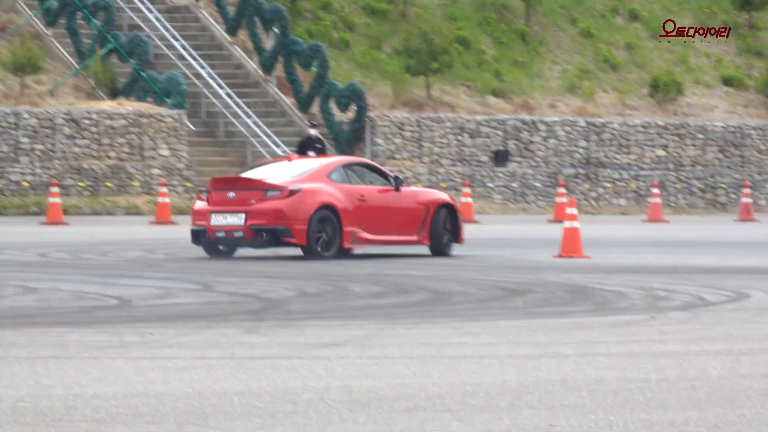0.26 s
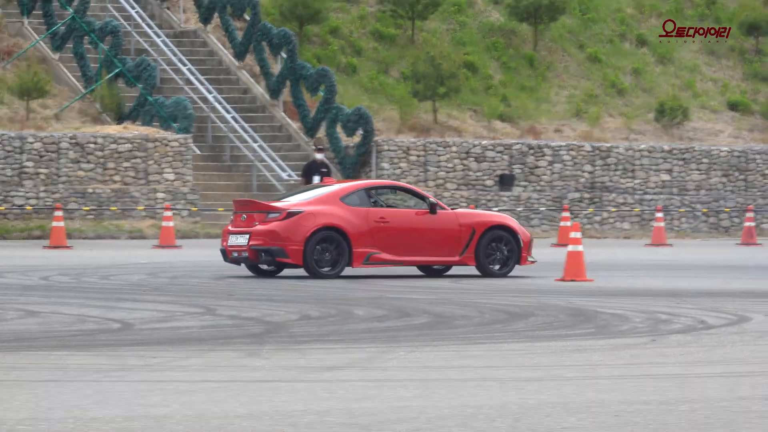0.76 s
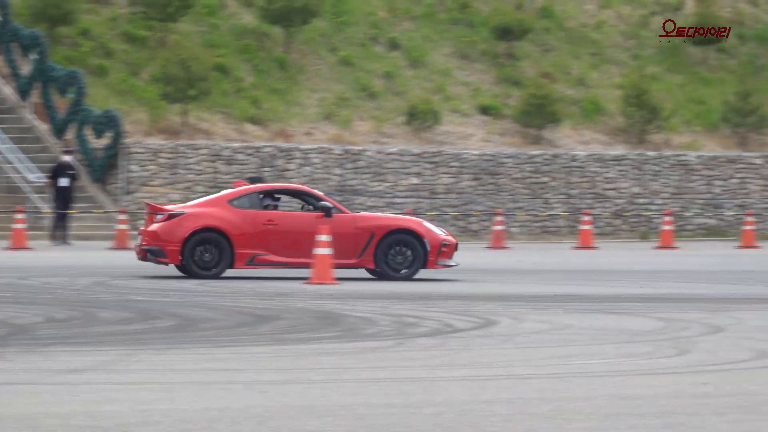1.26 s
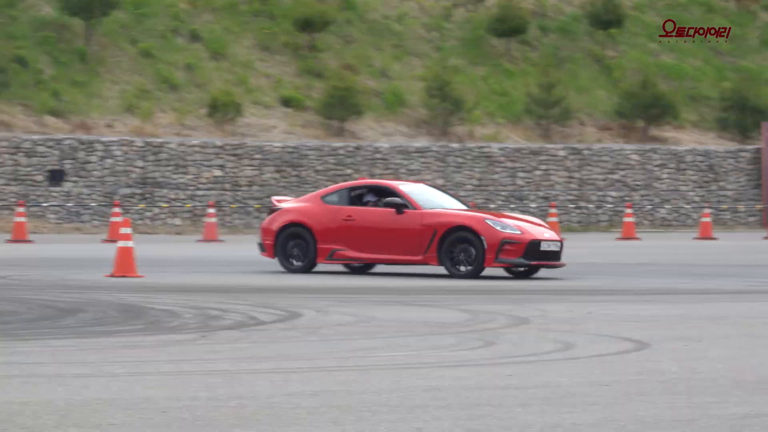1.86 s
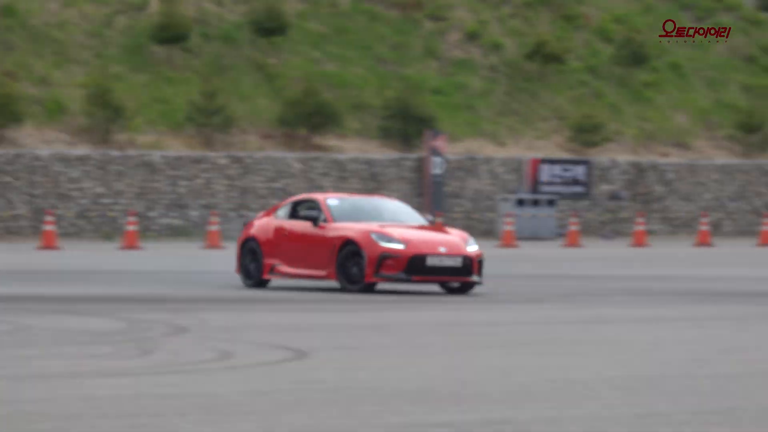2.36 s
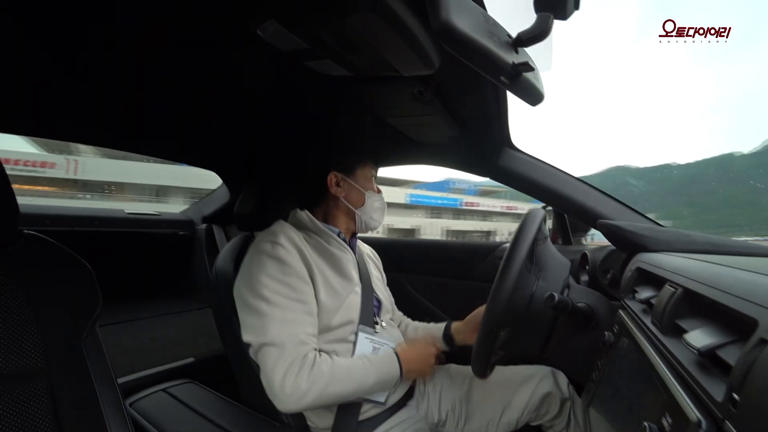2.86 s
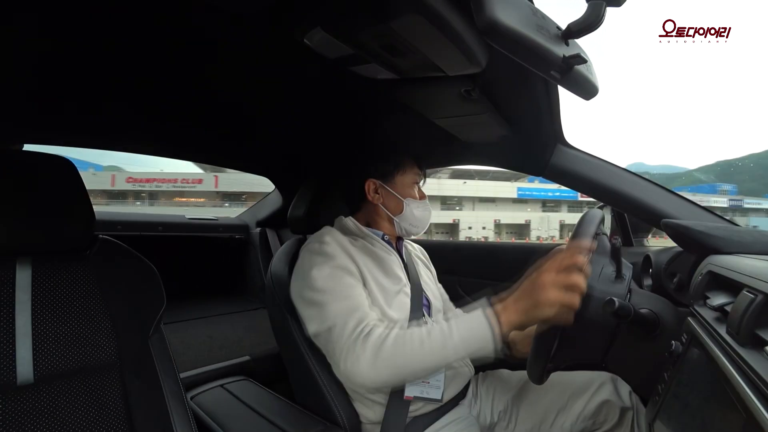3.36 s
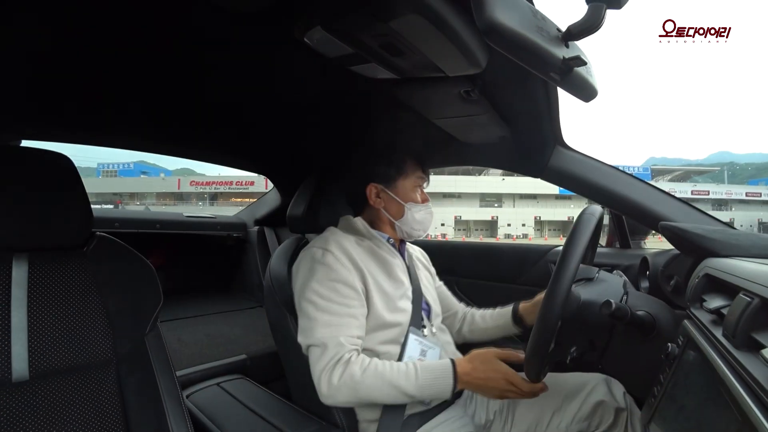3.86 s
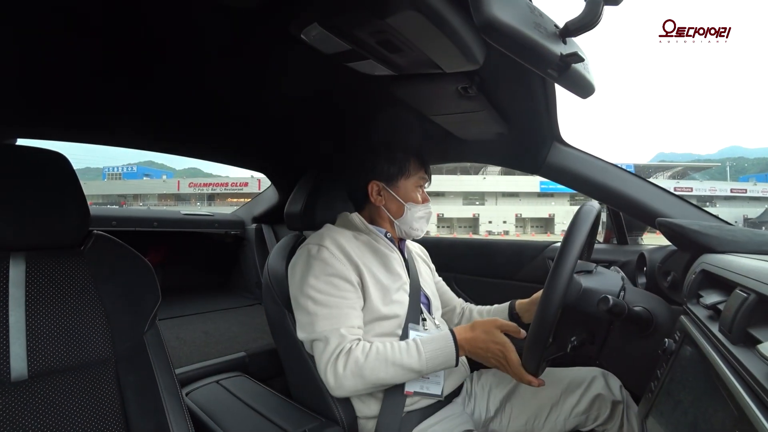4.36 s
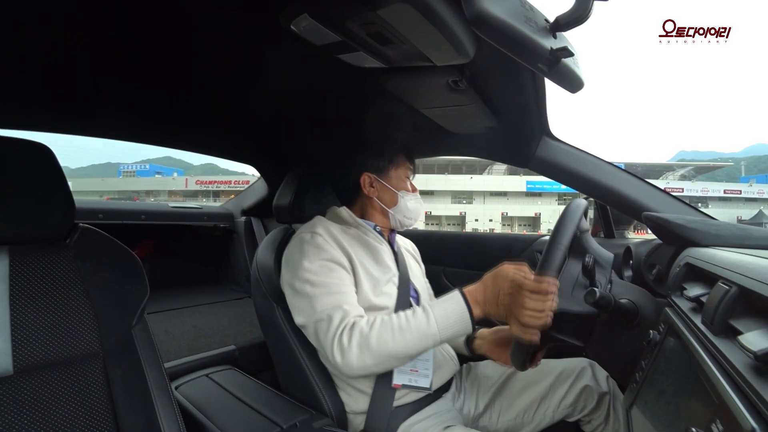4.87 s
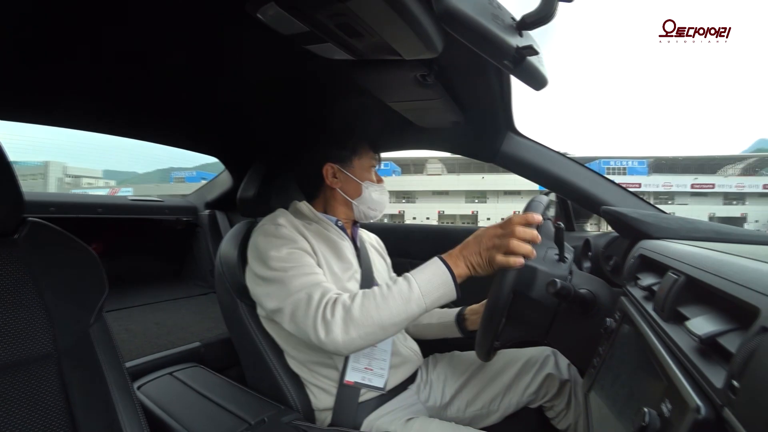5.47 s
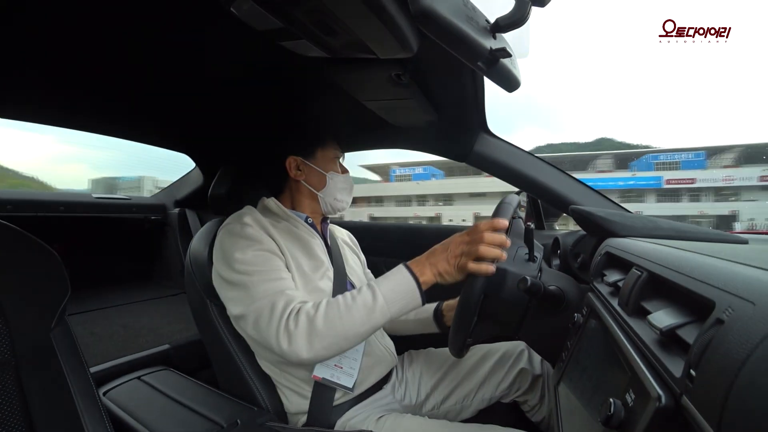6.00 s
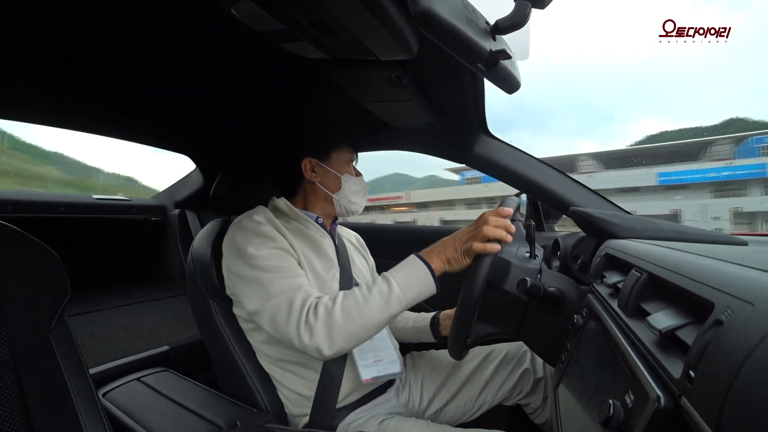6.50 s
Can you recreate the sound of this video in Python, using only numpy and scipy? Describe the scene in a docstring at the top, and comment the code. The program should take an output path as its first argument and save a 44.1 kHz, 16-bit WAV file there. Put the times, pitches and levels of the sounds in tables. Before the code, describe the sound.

Loud wavering tyre screech outdoors over a rising distant engine, then an abrupt jump into a car cabin with low engine growl, road rumble and loose knocks.

```python
"""Tyres of a sports car drifting round cones screech, heard in open air beside a stone wall, over a rising engine.
Each tread is a wavering stick-slip tone with harmonics; torn rubber and grit are coloured noise.
The second place is the cabin: flat-four tones at multiples of the crankshaft speed pull up from low revs.
Filtered noise makes road rumble, squeaks and the driver's sleeves; short decaying rings with clicks make knocks,
the first three soft, like a sleeve brushing, the rest loose trim. A limiter holds the peaks of both ears."""
import sys
import numpy as np
from scipy import signal
from scipy.fft import rfft, irfft, next_fast_len
from scipy.io import wavfile
from scipy.ndimage import uniform_filter1d, minimum_filter1d, map_coordinates

SR = 44100
rng = np.random.default_rng(int(sys.argv[2]) if len(sys.argv) > 2 else 0)


def unload_wav(signal):
    """Save mono or channel-first audio to the path in sys.argv[1] as 16-bit WAV at rate SR, clipped to [-1, 1]."""
    wavfile.write(
        sys.argv[1],
        SR,
        np.round(np.clip(np.atleast_2d(signal).T, -1, 1) * 32767).astype(np.int16),
    )


N = 297230
T = np.arange(N) / SR
CUT_S, CUT_FADE_S = 2.742, .012  # middle and length of the jump from trackside to cabin

# Trackside, tyres. Squeal levels are those before flutter.
# leading tyre: time_s, pitch_hz, level_db, second_harmonic_db (over the fundamental)
LEADING_TYRE = [(0, 694.3, -18, -4), (.13, 697.5, -20, -6), (.22, 695, -20.5, -15), (.31, 700, -17, -12),
                (.38, 706.3, -23.5, -5), (.44, 723, -15.5, -7.5), (.6, 753, -16, -12.5),
                (.75, 768.6, -19, -11), (.85, 814.5, -24, -13.5), (1, 839, -24.5, -20),
                (1.15, 858.3, -25, -17), (1.5, 866.3, -25, -12.5), (1.75, 871.3, -22, -14),
                (1.85, 875, -24, -10), (1.93, 877.2, -17.5, -18), (2.1, 859, -19.5, -20),
                (2.22, 828, -23.5, -16), (2.3, 773, -19, -9.5), (2.44, 763, -21.5, 0.5),
                (2.74, 763, -24, -3)]
# its harmonics 3 to 5 over the fundamental in a full slide: before_spin_db, after_spin_db
LEADING_OVERTONES = [(-19.5, -14), (-15.5, -21.5), (-27.5, -36.5)]
OVERTONES_GROW = 1  # their dB per dB of slide force
# heavily loaded tyre, base level before each harmonic's offset: time_s, pitch_hz, level_db
LOADED_TYRE = [(0, 626, -24), (.17, 628, -21.5), (.23, 650, -28), (.3, 670, -25.5), (.4, 702, -26),
               (.48, 720, -37.5), (.67, 725, -32), (.73, 745, -46), (1.3, 803, -49), (1.8, 807, -42.5),
               (1.95, 801, -35), (2.2, 784, -32.5), (2.4, 764, -32.5)]
# inner rear tyre, spinning a little faster and beating against the leading one: time_s, pitch_hz, level_db
INNER_TYRE = [(.7, 830, -48), (.95, 886.7, -23.5), (1.06, 899.4, -29.5), (1.15, 910, -18.5),
              (1.26, 918.3, -29.5), (1.34, 920, -28.5), (1.7, 925, -26), (2, 939.7, -23.5), (2.2, 943, -20),
              (2.47, 950, -34.5), (2.54, 940, -17.5), (2.74, 947, -18.5)]
# the inner tyre grabs and yelps: peak_s, gain_db (over its squeal)
INNER_GRABS = [(1.134, 5.5), (1.234, 12), (1.398, 11), (1.473, 10), (2.166, 5)]
GRAB_S = .014  # length of a grab
# lightly loaded tyre: time_s, pitch_hz, level_db
LIGHT_TYRE = [(.15, 900, -46.5), (.31, 926, -32), (.5, 942, -29.5), (.62, 958, -38), (.72, 979, -27.5),
              (.8, 1002, -25), (.92, 997, -33.5), (1.27, 1004, -33), (1.75, 1002, -29), (2, 1023, -24.5),
              (2.17, 1042, -22.5), (2.3, 1019, -21), (2.5, 1005, -21.5), (2.74, 1035, -28)]
# tread rib, strongest on harmonics 3 and 4, base level before their offsets: time_s, slip_hz, level_db
TREAD_RIB = [(.17, 667, -54), (.21, 674.3, -26.5), (.3, 692.4, -29.5), (.36, 702.7, -32), (.46, 730, -31.5),
             (.55, 738, -38.5), (.65, 762, -34), (.73, 795, -40), (.82, 832, -43), (.95, 844, -56),
             (1.1, 863, -80)]
# tread blocks locked onto one note: start_s, end_s, pitch_hz, fundamental_db, second_harmonic_db
HELD_NOTES = [(-.05, .28, 597.7, -30, -25.5), (0.032, .28, 648, -39, -25.5), (2.615, 2.708, 657, -31, -45)]
HELD_EDGE_S = .04  # such a note builds and breaks in this time
# raggedness of the squeal: time_s, roughness (0-1)
SQUEAL_RAGGEDNESS = [(.35, .33), (.7, .44), (.95, .8), (2.1, .8), (2.35, .7)]
# force of the slide, read against FULL_SLIDE_DB: time_s, force_db
SLIDE_FORCE = [(0.0, -37.5), (0.63, -41.5), (0.73, -47.5), (0.95, -49.5), (1.07, -55), (1.41, -55),
               (2.29, -37.5), (2.52, -40), (2.7, -41.5)]
FULL_SLIDE_DB = -39
# the wheels spin up: from_s, to_s
SPIN_UP = [0.59, 0.95]

# Trackside, noise and engine. Noise spectra are relative: the noise is then levelled.
# rubber sliding, before the wheels spin: freq_hz, density_db (per Hz)
SLIDING_RUBBER = [(100, -60.5), (300, -33.5), (450, -25), (600, 0), (950, 3.5), (1180, 3), (1450, 5.5),
                  (1750, -3), (2150, 0), (2900, -7), (3400, -14.5), (5000, -20), (8000, -65.5)]
# rubber under spinning wheels: freq_hz, density_db (per Hz)
SPINNING_RUBBER = [(100, -59.5), (450, -20.5), (570, -9), (720, 3), (950, 9), (1120, 2), (1300, 0.5),
                   (1600, 3.5), (1950, -1.5), (2300, -3.5), (2600, -4.5), (2950, -6.5), (3400, -17),
                   (5000, -18), (8000, -63.5)]
# thrown grit: freq_hz, density_db (per Hz)
GRIT_HISS = [(1880, -34), (3200, -3.5), (4140, -6.5), (4900, -17.5), (6730, -21.5), (12800, -52.5),
             (15000, -56.5)]
SCRUB_DB, SCRUB_GROWS = -23.5, 0.51  # tearing rubber in a full slide; dB per dB of force
GRIT_DB, GRIT_GROWS = -35, 1.1  # grit, likewise
# distant engine: time_s, crankshaft_hz, firing_tone_db
FAR_ENGINE = [(.4, 39.96, -80.5), (.8, 61.76, -58.5), (1, 68.25, -50), (1.25, 73.6, -46),
              (1.5, 81.33, -43.5), (1.85, 96.68, -41.5), (2, 103.3, -47.5), (2.17, 107.5, -45),
              (2.4, 106, -76)]
# its crank orders over the firing tone: order (per turn), low_revs_db, high_revs_db
EXHAUST_ORDERS = [(2, 0, -4.5), (3, 1, -1.5), (4, -2, -1), (4.5, -18, -8), (5, -14.5, -3.5), (5.5, -18, -8),
                  (6, -11.5, -3.5), (8, -7, -1)]
# tailpipe resonances: freq_hz, gain_db
TAILPIPE = [(80, 0.5), (150, -3.5), (190, 0), (220, -4), (270, -9), (320, -4), (360, -5.5), (400, 3.5),
            (440, -5), (500, -1.5), (620, 6), (700, 10), (900, 6)]
FAR_FRAY = .21  # unevenness from firing to firing (0-1)
# open air of the place: freq_hz, density_db (per Hz)
OUTDOOR_AIR = [(25, -14.5), (70, -14), (130, -4.5), (220, 2.5), (500, 5), (1500, 5.5), (6000, -31.5),
               (15000, -34.5)]
WALL_DB = -9  # the stone wall's echo before its bass cut, under the direct sound
# noise outdoors: freq_hz, left_right_likeness (0-1)
OUTDOOR_LIKENESS = [(200, 0.89), (700, 0.99), (2000, 0.3), (6000, 0.54), (12000, .3)]
# left ear over right outdoors: freq_hz, level_db
EAR_LEVEL = [(200, 0), (380, -1), (700, -5), (1290, -8.5), (2380, -10.5), (4400, 1.5), (8000, -14),
             (15000, 11)]
# phase by which the left ear leads outdoors: freq_hz, lead_rad
EAR_PHASE = [(100, 1.5), (1400, 0.31), (2400, 1), (4100, -2.07), (4750, -2.5), (6200, -9), (14000, -14.5)]

# Cabin, engine from the seat.
# engine speed: time_s, crankshaft_hz
CABIN_REVS = [(2.76, 30.4), (2.92, 32.03), (3.1, 29.3), (3.3, 33.43), (3.45, 33.58), (3.6, 37.06),
              (4.2, 43.15), (4.4, 46.2), (4.62, 49.41), (5, 55.95), (5.46, 63.28), (5.8, 67.63), (6, 66),
              (6.3, 59.4), (6.74, 57.75)]
# growl, over its common level: order (per turn), low_revs_db, high_revs_db
GROWL_ORDERS = [(1, -13, -4), (2.5, -27, -13.5), (3, -8, -5.5), (3.5, -19, -19.5), (4, 1, -2),
                (4.5, -15, -14), (5, -9, -6.5), (5.5, -11.5, -8.5), (6, -8.5, -4.5), (6.5, -11, -14),
                (7, -10, -12), (7.5, -18, -15.5), (8, -11, -8.5), (9, -11.5, -14), (9.5, -20, -10.5),
                (10, -7, -16), (11, -17.5, -14), (12.1, -6.5, -10.5), (14, -10.5, -18.5), (15.5, -16, -18),
                (17.8, -10, -14), (20, -13, -20)]
# boom of the cabin on the firing tone: freq_hz, gain_db
CABIN_BOOM = [(60, 1), (68, -1.5), (75, -1), (81, -4), (87, 3), (95, -4.5), (100, -3), (106, 2.5),
              (114, -5), (123, 4.5), (129, -3), (134, -4)]
# cabin resonances on the growl: freq_hz, gain_db
CABIN_RESONANCES = [(60, -12.5), (135, -5), (165, 0.5), (200, 1), (240, -4), (265, -1.5), (295, -3),
                    (340, 3), (375, 3), (405, 5), (445, 3), (480, -1), (520, 2), (570, -3.5), (620, -4),
                    (670, -4.5), (900, -6), (1400, -12)]
# throttle presses, load over coasting: start_s, end_s, load_db
THROTTLE = [(3.233, 3.413, 8.5), (3.528, 3.676, 6), (3.803, 4.032, 5), (4.11, 4.48, 4), (4.455, 5.18, 13),
            (5.181, 5.525, 9), (5.505, 5.818, 5.5)]
PRESS_S, LIFT_S = 0.062, 0.061  # the engine takes up and sheds its load
FIRING_DB, FIRING_GROWS = -39, 0.72  # firing tone when coasting; its dB per dB of load
GROWL_DB, GROWL_GROWS = -39, 0.8  # growl, likewise
CABIN_FRAY, CABIN_UNEVEN_DB = .1, 2.6  # firing unevenness (0-1); slow waver of each growl order

# Cabin, knocks and sleeves.
# short knocks, the first three soft, like a sleeve brushing, the rest loose trim; clicks before a shared lift:
# start_s, ring_db, most_excited_hz, click_db
SHORT_KNOCKS = [(3.062, -29, 2000, -37.5), (3.89, -27, 2002, -38), (3.912, -36, 2008, -35),
                (4.014, -12, 960, -27.5), (4.02, -17, 945, -33), (4.077, -11.5, 899.6, -31.5),
                (5.123, -17.5, 770, -34), (6.235, -25.5, 605, -34), (6.288, -10.5, 630, -28.5),
                (6.3115, -15.5, 726, -32), (6.3376, -15.5, 597, -33), (6.3396, -17.5, 900, -22),
                (6.3416, -14, 600, -28), (6.622, -15.5, 740, -33.5)]
# ringing modes of a knock before they scatter: freq_hz, level_db, decay_60db_s
KNOCK_MODES = [(510, 5.5, 0.032), (690, -17, 0.055), (770, 2, 0.057), (882, -1.5, 0.046),
               (1144, -13.5, 0.062), (1360, -11, 0.0088), (1700, -9, 0.038), (2360, -16, 0.081),
               (3295, -13.5, 0.043)]
# dry click of a knock: freq_hz, density_db (per Hz)
CLICK_SPECTRUM = [(300, -11), (1500, 5), (3200, 2), (6000, -1), (8000, -14), (15500, -23.5)]
CLICK_LIFT_DB = 2.5
# small hard parts that ping: start_s, freq_hz, level_db, decay_60db_s
TRIM_PINGS = [(4.018, 3450, -40, 0.021), (5.128, 1910, -35, 0.098), (6.2922, 2600, -28, 0.014),
              (6.3115, 6200, -37, 0.013), (6.3402, 3510, -21, 0.02), (6.3424, 3110, -12, 0.011)]
PUSH_DB, PUSH_S = -5, 0.00035  # first shove over the knock's ring level; its half width
# strokes of the arms: peak_s, length_s, rub_db, fizz_db
SLEEVE_STROKES = [(2.824, 0.091, -50, -54), (2.964, 0.13, -46.5, -56.5), (3.052, 0.065, -43.5, -54.5),
                  (3.204, .11, -46, -50.5), (3.446, 0.22, -49, -61), (3.768, 0.29, -59.5, -53.5),
                  (3.919, 0.067, -45.5, -65), (4.092, 0.45, -46, -60), (4.541, .2, -49, -63),
                  (4.885, 0.14, -54, -65.5), (5.129, 0.32, -51, -60.5), (5.574, .25, -58.5, -69.5),
                  (5.993, 0.17, -54, -67.5), (6.214, 0.43, -52, -62.5), (6.501, 0.085, -64, -63),
                  (6.74, 0.074, -54, -62)]
# low rub of the cloth: freq_hz, density_db (per Hz)
CLOTH_RUB = [(1000, -17), (2000, 0.5), (2700, -2), (4000, -5), (6500, -12), (9000, -20.5), (15000, -42)]
# high fizz of the cloth: freq_hz, density_db (per Hz)
CLOTH_FIZZ = [(3000, -14), (7000, -0.5), (10000, -7), (15500, -1.5)]
REST_RUB_DB, REST_FIZZ_DB = -61.5, -70.5  # the cloth between strokes

# Cabin, road and the ears.
# rumble through the floor: freq_hz, density_db (per Hz)
FLOOR_RUMBLE = [(20, -32), (35, -14), (60, 2.5), (100, -5), (165, 4.5), (235, 6), (330, -4), (480, -3),
                (700, -15.5), (1500, -58.5)]
RUMBLE_DB, RUMBLE_DB_PER_S = -41, 3  # at the jump; growth after it
# rough patches: peak_s, length_s, level_db
ROUGH_PATCHES = [(2.984, 0.15, -31.5), (3.621, 0.15, -30.5), (4.87, 0.39, -36), (6.01, 0.14, -28.5),
                 (6.172, 0.17, -25.5), (6.498, 0.1, -27.5), (6.6, 0.07, -27.5)]
# the floor on such a patch: freq_hz, density_db (per Hz)
FLOOR_DRUMMING = [(25, -32), (55, -7), (100, -9.5), (165, 7), (235, 4.5), (320, -7), (450, -8.5),
                  (1000, -21.5), (2500, -52.5)]
# tyre roar behind the glass: freq_hz, density_db (per Hz)
TYRE_ROAR = [(250, -8.5), (480, -2), (600, -9.5), (750, -7.5), (1130, -9), (1450, -15.5), (2150, -26),
             (3000, -28.5), (6000, -50.5), (12000, -79)]
# its level before flutter: time_s, level_db
TYRE_ROAR_LEVEL = [(2.77, -41), (3.4, -36.5), (3.75, -41), (4.05, -32.5), (4.35, -36), (5.1, -34.5),
                   (5.6, -37), (6.15, -31.5), (6.74, -36)]
# faint tyre squeaks behind the glass: peak_s, length_s, freq_hz, level_db
TYRE_SQUEAKS = [(3.36, 0.15, 1284, -43), (3.608, 0.18, 2400, -56), (4.194, 0.073, 1019, -40.5),
                (4.209, 0.18, 2608, -45), (4.554, 0.19, 2450, -48.5), (5.343, 0.35, 1740, -50.5)]
# noise in the cabin: freq_hz, left_right_likeness (0-1)
CABIN_LIKENESS = [(60, .9995), (220, 0.99), (500, 0.99), (1200, 0.97), (2400, 0.82), (4400, .65),
                  (8000, 0.22), (14000, .05)]
DIP_S, DIP_LENGTH_S, DIP_DB = 6.372, 0.057, -8  # the cabin's level dips briefly
TOP_HZ = 15830  # nothing is kept above


def tyres():
    """Each tyre sings at its own pitch; the leading one's overtones brighten with the force of the slide."""
    ragged, = curves(SQUEAL_RAGGEDNESS)

    hz, db, second = curves(LEADING_TYRE)
    db = db + 1.4 * ragged * wobble(30)
    upper = [db + spin_up(*pair) + OVERTONES_GROW * slide_force() for pair in LEADING_OVERTONES]
    # the overtones come in as the tread lets go fully
    upper = np.array(upper) + np.interp(T, [.25, .48], [-9, 0])
    lead = squeal(hz, [db, db + second, *upper],
                  waver=0.01384 * ragged, jitter=0.0463 * ragged, flutter_db=3.4 * ragged)

    hz, db = curves(LOADED_TYRE)
    levels = [db - 8, db + spin_up(-7, 0), db + spin_up(0, -8), db - 13]
    loaded = squeal(hz, levels, waver=0.017 * ragged, jitter=0.05 * ragged, flutter_db=3.3)

    hz, db = curves(INNER_TYRE)
    db = db + sum(gain_db * swell(peak, GRAB_S) for peak, gain_db in INNER_GRABS)
    inner = squeal(hz, [db, db - 22.5], waver=0.014 * ragged, jitter=0.045 * ragged, flutter_db=3.0)

    hz, db = curves(LIGHT_TYRE)
    light = squeal(hz, [db, db - 24], waver=0.01607 * ragged, jitter=0.0505 * ragged, flutter_db=3.0)

    hz, db = curves(TREAD_RIB)
    rib = squeal(hz, [db - 9.5, db - 8.5, db - 3, db - 2.5], waver=.005, jitter=.014, flutter_db=2.5)
    return lead + loaded + inner + light + rib + held_notes()


def squeal(hz, levels, waver, jitter, flutter_db):
    """Stick-slip of one tread: pitch wavers; overtones stray more than the fundamental as blocks grip and let go."""
    wavering_hz = hz * (1 + waver * wobble(55) + jitter * wobble(420))
    phase = 2 * np.pi * np.cumsum(wavering_hz) / SR
    grip = wobble(160)  # shared by all harmonics
    sound = 0
    for k, db in enumerate(levels, 1):
        flutter = unit(amp(flutter_db * grip + 1.1 * np.sqrt(k) * wobble(70)))
        stray = 0.7 * np.sqrt(k - 1) * wobble(70)
        sound = sound + amp(db) * flutter * np.sqrt(2) * np.sin(k * phase + stray)
    return sound


def held_notes():
    """A tread block sings around one steady pitch, then lets go."""
    sound = 0
    for start, end, hz, *levels in HELD_NOTES:
        gate = np.clip(np.minimum(T - start, end - T) / HELD_EDGE_S + .5, 0, 1)
        sound = sound + gate * squeal(hz, levels, waver=.006, jitter=.022, flutter_db=2.6)
    return sound


def slide_force():
    """Force of the slide in dB, 0 at the full-slide reference."""
    return curves(SLIDE_FORCE)[0] - FULL_SLIDE_DB


def spin_up(before, after):
    """A value that moves from before to after as the wheels spin up."""
    return np.interp(T, SPIN_UP, [before, after])


def scrub():
    """Rubber tears over asphalt, recoloured as the wheels spin, with a hiss of grit; both grow with slide force."""
    force_db = slide_force()
    spin = spin_up(0, 1)
    sliding = np.sqrt(1 - spin) * rush(SLIDING_RUBBER, OUTDOOR_LIKENESS)
    spinning = np.sqrt(spin) * rush(SPINNING_RUBBER, OUTDOOR_LIKENESS)
    tearing = amp(SCRUB_DB + SCRUB_GROWS * force_db + 0.85 * wobble(40.1)) * (sliding + spinning)
    grit_gain = amp(GRIT_DB + GRIT_GROWS * force_db + 1.3 * wobble(40))
    return tearing + grit_gain * rush(GRIT_HISS, OUTDOOR_LIKENESS)


def far_exhaust():
    """The distant exhaust: crank orders coloured by the tailpipe, their balance shifting with revs."""
    crank_hz, firing_db = curves(FAR_ENGINE)
    high = np.clip((crank_hz - 78) / 24, 0, 1)
    levels = [(k, firing_db + slow + high * (fast - slow)) for k, slow, fast in EXHAUST_ORDERS]
    return orders(crank_hz, levels, TAILPIPE, uneven_db=3, jitter=0.0041, rough=FAR_FRAY)


def trackside():
    """Open air by a stone wall: the wall scatters tyres and exhaust; ear level and phase differ with frequency."""
    sound = echoes(tyres() + far_exhaust(), t60=0.4, wet_db=WALL_DB, low_hz=750)
    sound = sound + scrub() + amp(-41.5) * rush(OUTDOOR_AIR, OUTDOOR_LIKENESS)
    ear = np.array([[1], [-1]])  # left, right

    def ears(hz):
        level = 2 / (1 + amp(-ear * along(EAR_LEVEL, hz)))
        return level * np.exp(.5j * ear * along(EAR_PHASE, hz))

    return filtered(sound * np.minimum(T / .002, 1), ears)


def engine():
    """Two firings a turn boom in the cabin; the growl shifts with revs and both swell with the throttle."""
    crank_hz, = curves(CABIN_REVS)
    load_db = 0
    for start, end, db in THROTTLE:
        taken_up = np.clip((T - start) / PRESS_S, 0, 1)
        shed = np.clip((T - end) / LIFT_S, 0, 1)
        load_db = load_db + db * (taken_up - shed)
    firing = orders(crank_hz, [(2, FIRING_DB + FIRING_GROWS * load_db)], CABIN_BOOM,
                    uneven_db=1.5, jitter=.003, rough=CABIN_FRAY)
    high = np.clip((crank_hz - 38) / 17, 0, 1)
    growl_db = GROWL_DB + GROWL_GROWS * load_db
    levels = [(k, growl_db + slow + high * (fast - slow)) for k, slow, fast in GROWL_ORDERS]
    growl = orders(crank_hz, levels, CABIN_RESONANCES,
                   uneven_db=CABIN_UNEVEN_DB, jitter=0.0031, rough=CABIN_FRAY)
    return firing + growl


def orders(crank_hz, levels, colour, uneven_db, jitter, rough):
    """Multiples of crank speed glide through fixed resonances; uneven firing frays the higher orders more."""
    phase = 2 * np.pi * np.cumsum(crank_hz * (1 + jitter * wobble(30))) / SR
    sound = 0
    for k, db in levels:
        fray = rough * np.sqrt(k)
        tone = np.sin(k * phase + rng.uniform(0, 2 * np.pi) + fray * wobble(40))
        tone = tone * unit(1 + fray * wobble(55))
        gain = amp(db + along(colour, k * crank_hz) + uneven_db * wobble(10))
        sound = sound + gain * np.sqrt(2) * tone
    return sound


def knocks():
    """Short knocks, three soft and sleeve-like, then loose trim: a shove, a click and a ring; small parts ping."""
    t = np.arange(SR // 5) / SR
    rings, contact = np.zeros(N + SR), np.zeros(N + SR)
    u = t / PUSH_S - 2
    push = amp(PUSH_DB) * (1 - 2 * u ** 2) * np.exp(-u ** 2)
    click_decay = amp(-60 * t / 0.017) + amp(-15.5 - 60 * t / 0.12)
    for start, ring_db, focus_hz, click_db in SHORT_KNOCKS:
        ring = 0
        for hz, db, t60 in KNOCK_MODES:
            # modes far from the most excited pitch are weaker, by about 8 dB at most
            weight_db = -8 * min(2 * abs(np.log2(hz / focus_hz)), 1) + rng.normal(0, 1.3)
            mode_hz = hz * rng.normal(1, 0.029)
            mode = np.sin(2 * np.pi * mode_hz * t + rng.uniform(0, 2 * np.pi))
            ring = ring + amp(db + weight_db - 60 * t / t60) * mode
        at = slice(round(start * SR), round(start * SR) + len(t))
        rings[at] += amp(ring_db) * (push + ring * (1 - np.exp(-t / 0.0005)))
        contact[at] += amp(click_db) * click_decay
    for start, hz, db, t60 in TRIM_PINGS:
        at = slice(round(start * SR), round(start * SR) + len(t))
        rings[at] += amp(db - 60 * t / t60) * np.sin(2 * np.pi * hz * t)
    clicks = amp(CLICK_LIFT_DB) * contact[:N] * rush(CLICK_SPECTRUM, CABIN_LIKENESS)
    return echoes(rings[:N], t60=0.039, wet_db=-17.0, low_hz=400) + clicks


def sleeves():
    """Each stroke of an arm swells and fades; the cloth rubs in uneven catches."""
    rub, fizz = amp(REST_RUB_DB), amp(REST_FIZZ_DB)
    for peak, length, rub_db, fizz_db in SLEEVE_STROKES:
        stroke = swell(peak, length)
        rub = rub + amp(rub_db) * stroke
        fizz = fizz + amp(fizz_db) * stroke
    catches = unit(amp(1.4 * wobble(60) + 1.1 * wobble(350)))
    return catches * (rub * rush(CLOTH_RUB, CABIN_LIKENESS) + fizz * rush(CLOTH_FIZZ, CABIN_LIKENESS))


def squeaks():
    """Short hazy swells as the steered tyres scrub: random slips excite one narrow tread resonance."""
    sound = 0
    for peak, length, hz, db in TYRE_SQUEAKS:
        slips = rng.standard_normal(N)
        tread = unit(filtered(slips, lambda f: 1 / (1 + ((f / hz - 1) / .04) ** 2)))
        sound = sound + amp(db) * swell(peak, length) * tread
    return sound


def road():
    """Road rumble grows steadily, the floor drums on rough patches, and the tyres roar behind the glass."""
    rumble_db = RUMBLE_DB + RUMBLE_DB_PER_S * (T - CUT_S) + 0.6 * wobble(21)
    rumble = amp(rumble_db) * rush(FLOOR_RUMBLE, CABIN_LIKENESS)
    patches = sum(amp(db) * swell(peak, length) for peak, length, db in ROUGH_PATCHES)
    drumming = patches * rush(FLOOR_DRUMMING, CABIN_LIKENESS)
    roar_db = curves(TYRE_ROAR_LEVEL)[0] + 2.34 * wobble(25)
    return rumble + drumming + amp(roar_db) * rush(TYRE_ROAR, CABIN_LIKENESS)


def echoes(x, t60, wet_db, low_hz):
    """Hard surfaces scatter the sound back, differently to each ear; the bass stays in the middle."""
    t = np.arange(SR // 2) / SR
    tail = rng.standard_normal((2, len(t))) * amp(-60 * t / t60) * (t > .004)
    tail /= np.linalg.norm(tail, axis=1, keepdims=True)
    wet = signal.fftconvolve(x[None], tail, axes=1)[:, :N]
    return x + amp(wet_db) * filtered(wet, lambda hz: hz ** 2 / (hz ** 2 + low_hz ** 2))


def rush(spectrum, likeness):
    """Coloured stereo noise of rms 1; the mix of middle and side sets how alike the ears are."""
    def mid_side(hz):
        turn = np.arccos(np.clip(along(likeness, hz), -1, 1)) / 2
        return amp(along(spectrum, hz)) * [np.cos(turn), np.sin(turn)]

    mid, side = filtered(rng.standard_normal((2, N)), mid_side)
    return unit(np.array([mid + side, mid - side]))


def filtered(x, response):
    """x times a response of frequency, padded so that tails do not wrap onto the start."""
    m = next_fast_len(N + SR // 4)
    return irfft(rfft(x, m) * response(np.fft.rfftfreq(m, 1 / SR)), m)[..., :N]


def wobble(rate):
    """A smooth random curve, rate knots a second."""
    s = T[::16]
    knots = rng.standard_normal(N // 16)
    return np.interp(T, s, map_coordinates(knots, [s * rate + 2], mode="wrap"))


def swell(peak, length):
    """A smooth rise and fall, 1 at the peak and 1/e half a length (s) either side."""
    return np.exp(-(2 * (T - peak) / length) ** 2)


def curves(rows):
    """One value per sample for each column after the time."""
    s, *columns = np.transpose(rows)
    return [np.interp(T, s, column) for column in columns]


def along(points, hz):
    """Values of a frequency table read on a log axis."""
    f, v = np.transpose(points)
    return np.interp(np.log(hz + 1), np.log(f + 1), v)


def amp(db):
    """Decibels to gain."""
    return 10 ** (np.asarray(db) / 20)


def unit(x):
    """x at rms 1."""
    return x / np.sqrt(np.mean(x ** 2) + 1e-20)


def scene():
    """Trackside first, then the cabin, joined by a very short crossfade."""
    inside = np.clip((T - CUT_S) / CUT_FADE_S + .5, 0, 1)
    cabin = echoes(engine(), t60=0.055, wet_db=-28.5, low_hz=234)
    cabin = cabin + knocks() + sleeves() + squeaks() + road()
    dip = amp(DIP_DB * swell(DIP_S, DIP_LENGTH_S))
    return (1 - inside) * trackside() + inside * dip * cabin


def record(dry):
    """A fast limiter holds the highest peaks of both ears together; the band above TOP_HZ is removed."""
    needed = np.minimum(1, .8 / (np.abs(dry).max(axis=0) + 1e-9))
    gain = uniform_filter1d(minimum_filter1d(needed, size=400), size=400)
    return filtered(dry * gain, lambda hz: hz < TOP_HZ)


dry = scene()
out = record(dry)
unload_wav(out)
```